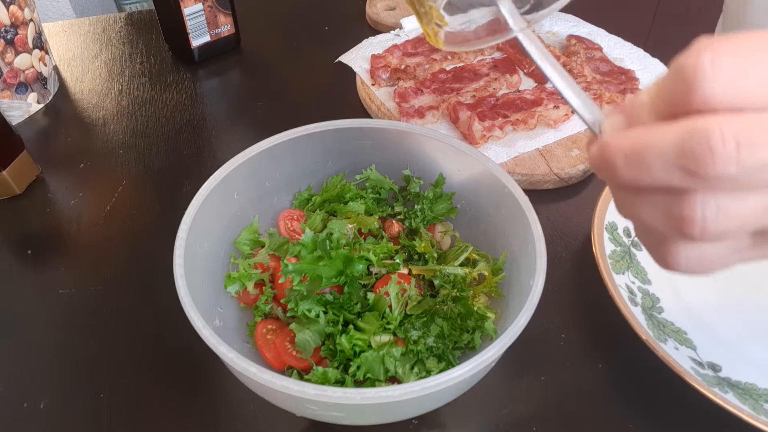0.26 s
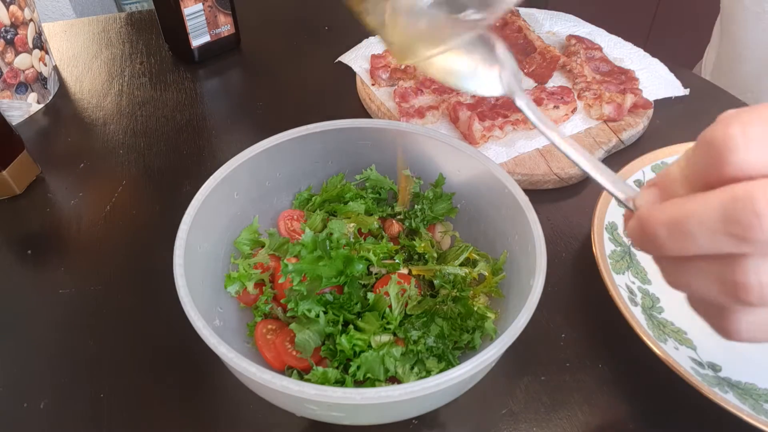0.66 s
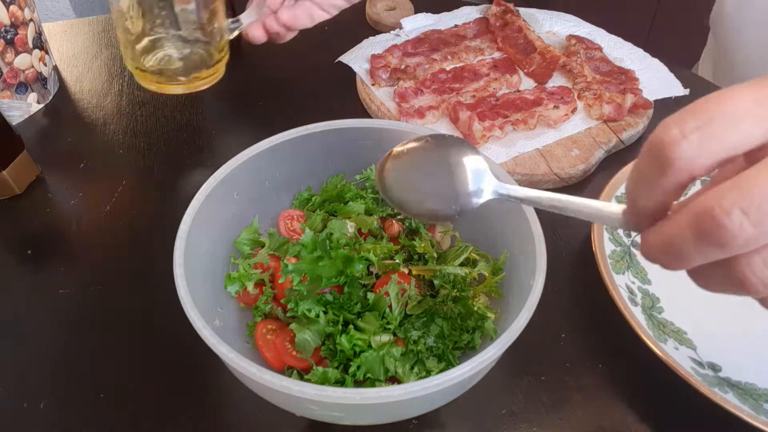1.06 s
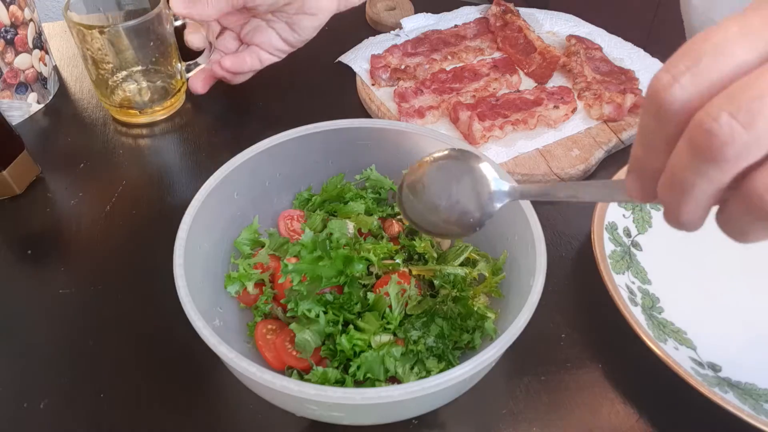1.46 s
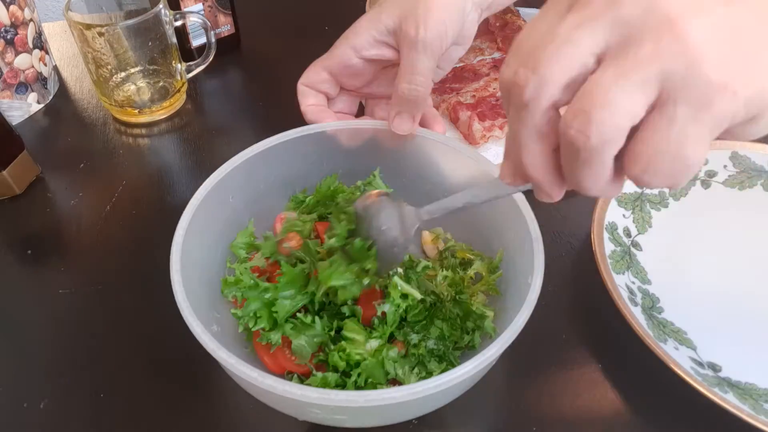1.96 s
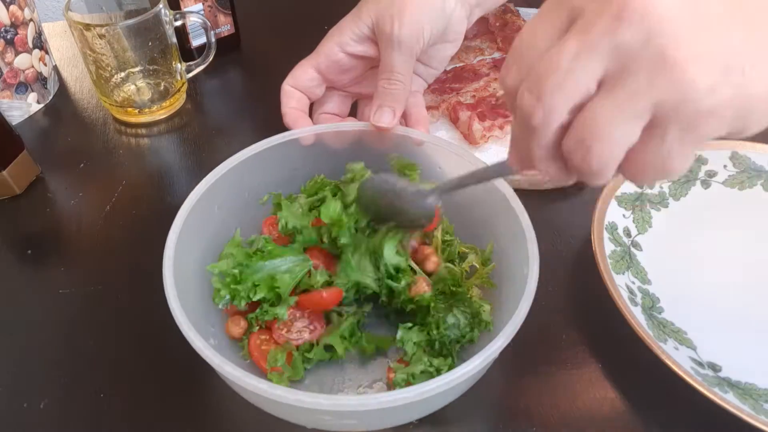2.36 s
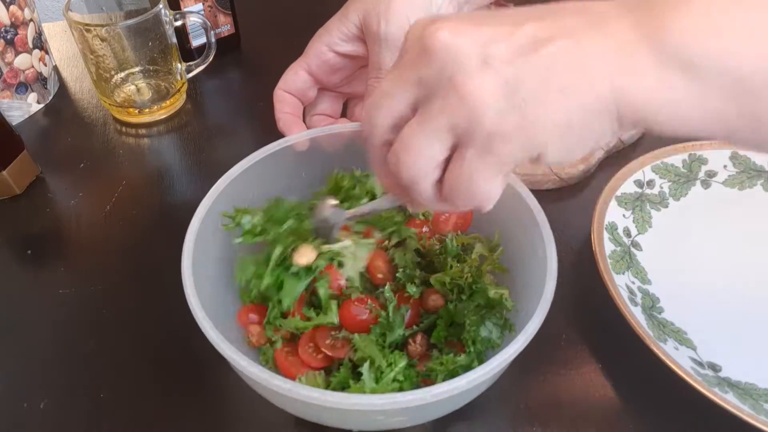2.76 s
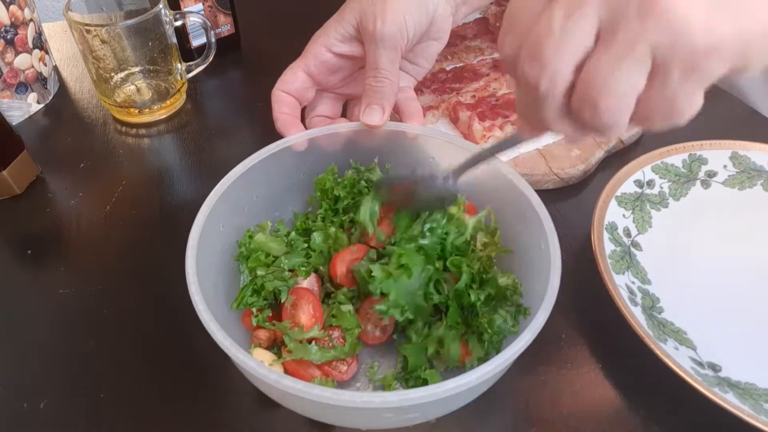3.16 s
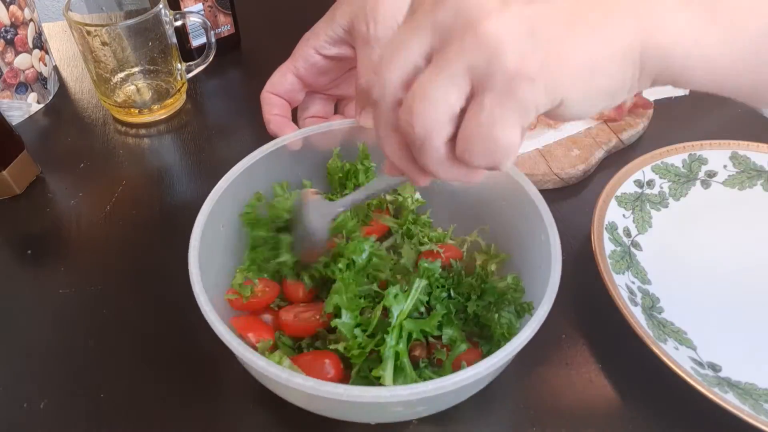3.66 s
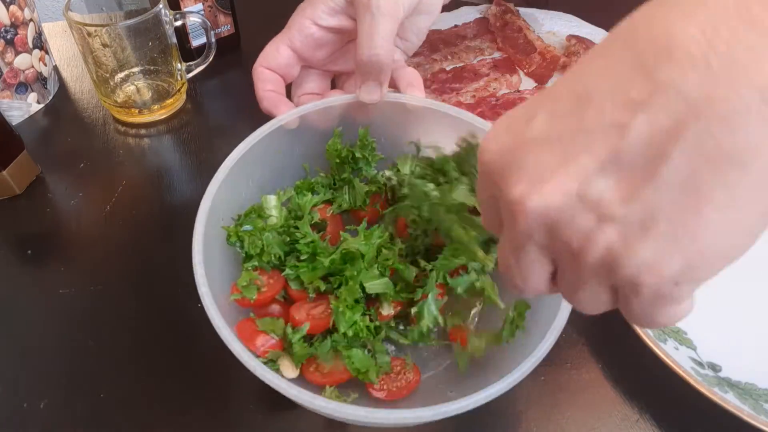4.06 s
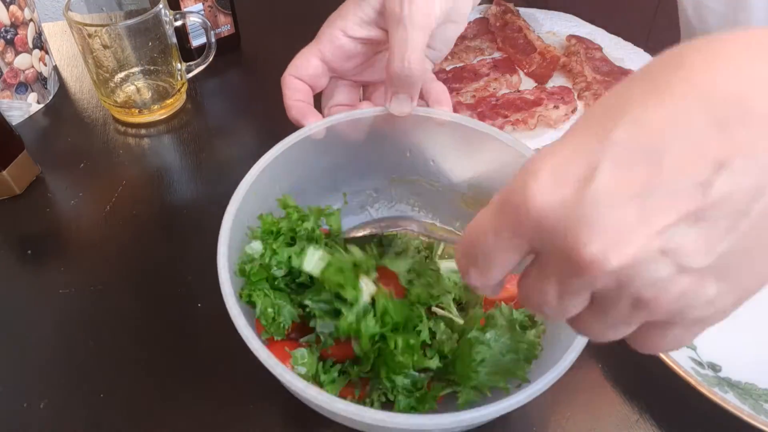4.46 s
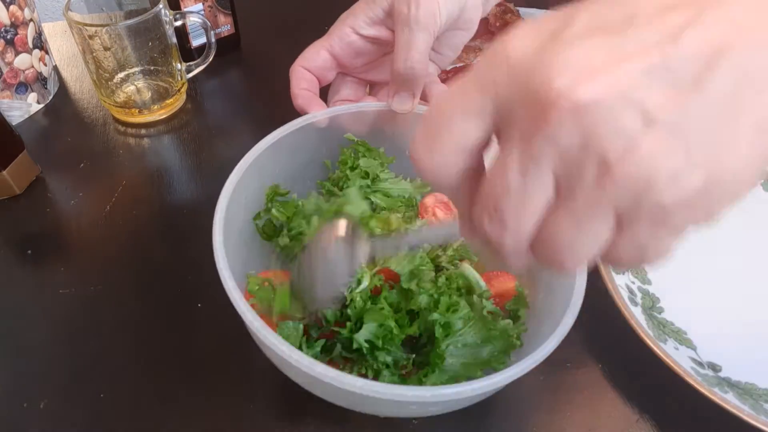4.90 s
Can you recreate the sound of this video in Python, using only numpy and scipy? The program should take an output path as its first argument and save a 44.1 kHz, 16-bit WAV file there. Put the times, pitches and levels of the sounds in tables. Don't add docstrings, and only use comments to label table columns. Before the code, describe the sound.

Close-up kitchen sound: hard, bright, damped glass clinks with a scratchy slide come first, thinning out within a second. After a brief lull, a heavy mug rocks onto a wooden table top. Salad mixing follows, each sweep a swish of leaves with spoon taps on dull plastic, bowl bumps on the table, and tiny stem snaps. Short room echo and a quiet steady fridge hum lie underneath.

```python
import sys
import numpy as np
from scipy import signal
from scipy.io import wavfile

SR = 44100
rng = np.random.default_rng(int(sys.argv[2]) if len(sys.argv) > 2 else 0)


def undo_db(level):
    steps = np.asarray(level, float) / 20
    return 10 ** steps


def generate_wav(sig):
    pcm = np.round(np.clip(np.atleast_2d(sig).T, -1, 1) * 32767).astype(np.int16)
    wavfile.write(sys.argv[1], SR, pcm)


N = 226365
SECONDS = np.arange(N) / SR
SIDES = np.array([[1], [-1]])


def at_hz(points, hz):
    table_hz, table_value = np.transpose(points)
    return np.interp(np.log(hz), np.log(table_hz), table_value)


def rms_one(x):
    return x / np.sqrt(np.mean(x ** 2) + 1e-20)


def band(x, low_hz, high_hz):
    edges_hz = [low_hz, min(high_hz, .45 * SR)]
    return signal.sosfilt(signal.butter(2, edges_hz, "band", fs=SR, output="sos"), x)


def drift(rate):
    r = np.exp(-80 * np.pi * rate / SR)
    noise = rng.standard_normal(N // 40 + 2002)
    slow = signal.lfilter([1], [1, -2 * r, r * r], noise)[2000:]
    return np.interp(np.arange(N) / 40, np.arange(len(slow)), rms_one(slow))


def ring(clicks, hz, t60_s):
    r, w = undo_db(-60 / (t60_s * SR)), 2 * np.pi * hz / SR
    return signal.lfilter([0, np.sin(w)], [1, -2 * r * np.cos(w), r * r], clicks + 1e-18)


def fade(clicks, t60_s):
    return signal.lfilter([1], [1, -undo_db(-60 / (t60_s * SR))], clicks + 1e-18)


def train(times_s, sizes):
    out = np.zeros((len(sizes), N))
    out[:, (np.asarray(times_s) * SR).astype(int)] = sizes
    return out


def coloured(white, spectrum, patchy_db, rate):
    total = 0
    for k, low_hz in enumerate(25 * 2 ** np.arange(0, 9.6, .5)):
        level = undo_db(at_hz(spectrum, low_hz * 1.214) + patchy_db * drift(rate))
        total = total + level * band(white[k % 2], low_hz, low_hz * np.sqrt(2))
    return rms_one(total)


def delayed(x, lag):
    n = np.arange(N)
    return np.array([x[0], np.interp(n - lag, n, x[1])])


def dip(x, hz, width_hz, db):
    return x - (1 - undo_db(db)) * signal.lfilter(*signal.iirpeak(hz, hz / width_hz, SR), x)


def voiced(x, rows):
    out, starts = x.copy(), sorted({row[0] for row in rows})
    ends = dict(zip(starts, starts[1:] + [N / SR]))
    for s, hz, width_hz, db in rows:
        now = slice(int(max(s - .001, 0) * SR), int((ends[s] - .001) * SR))
        out[:, now] = dip(out[:, now], hz, max(width_hz, 40), db)
    return out


def contact_levels(rows):
    start_s, force_db, hardness_db, focus_db = np.transpose(rows)[:4, :, None]
    place = np.arange(4) - 1.5
    return np.hstack([start_s, force_db + hardness_db * place - focus_db * place ** 2])


def struck(events, edges, modes, free_db, ring_db, crack_db, crack_t60, shift, soft_hz,
           lobe_db, pan_db, lag, apart=1.86, luck_db=4.0):
    rows = np.array(events)
    times = rows[:, 0] + 0.00083
    cracks, rings = np.zeros((2, N)), np.zeros((2, N + SR))
    luck = rng.standard_normal((60, 3, len(modes), 1))
    white = rng.standard_normal((4, 1, N)) + apart * rng.standard_normal((4, 2, N))
    for k, (low, high) in enumerate(zip(edges, edges[1:])):
        blows = train(times, [undo_db(rows[:, 1 + k] + crack_db[k])])
        click = band(blows, low, high) * 0.25 * SR / (high - low)
        rattle = 0.83 * fade(blows, crack_t60[k]) * rms_one(band(white[k], low, high))
        cracks += band(click + rattle, low / 1.34, high * 0.92)

    hz, db, t60 = np.transpose(modes)[:, :, None]
    k = np.clip(np.searchsorted(edges, hz) - 1, 0, 3)
    t = np.arange(int(min(t60.max(), 1) * SR)) / SR
    for row, s, free, (strength, beam, place) in zip(rows, times, free_db, luck):
        height = undo_db(row[1 + k] + free + np.array(ring_db)[k] + db + luck_db * strength)
        moved_hz = hz * (1 + shift * place)
        tones = height * undo_db(-60 * t / t60) * np.sin(2 * np.pi * moved_hz * t)
        lobes = undo_db(SIDES * lobe_db * beam.T)
        start = int(s * SR)
        rings[:, start:start + len(t)] += lobes @ tones

    soft = signal.butter(2, min(soft_hz, .45 * SR), fs=SR, output="sos")
    small = signal.butter(4, 1.0 * edges[0], "high", fs=SR, output="sos")
    out = signal.sosfilt(small, cracks + signal.sosfilt(soft, rings[:, :N]))
    return delayed(out * undo_db(SIDES * pan_db / 2), lag)


# start_s, force_db, hardness_db (per band), focus_db, spoon_ring_db
CLINKS = [(0.001, -25.5, 4, 1.5, -32), (0.018, -32.5, 1.3, 2.5, -38), (0.121, -21.5, 2, 0.8, -36.5),
          (0.214, -20.5, 4.5, 1.2, -34.5), (0.294, -42, 7, 3, -48.5), (0.312, -40.5, -5, -3.5, -53),
          (0.349, -47, 0.1, 4, -44.5), (0.366, -26, 2.5, 3.5, -18), (0.452, -28.5, 1, -0.5, -44),
          (0.477, -41.5, -2.5, 4, -37), (0.526, -23.5, -0.5, 0.5, -27), (0.535, -19, 2, -2, -27),
          (0.544, -27, 6.5, 5, -23), (0.649, -37, 1.5, 2, -40), (0.7, -47.5, 0.5, -0.7, -64),
          (0.757, -40, -0.3, -1.4, -67.5), (0.798, -48, 4, 0, -79)]
CHATTER = [(0.008, -31, 1.5, -0.5, -44.5), (0.013, -31.5, 1, 0.5, -45), (0.023, -36, 0, 1.5, -40.5),
           (0.056, -41, -2, 0.5, -40), (0.14, -37.5, 2, 2, -55), (0.158, -36.5, 0.5, -1, -50),
           (0.177, -38, -2, 3, -55), (0.236, -37.5, 1, 5, -55), (0.657, -43.5, 0, 2, -39),
           (0.791, -54, 4, 1, -80), (0.806, -53.5, 3, 3, -80), (0.196, -44.5, 2, 2, -55),
           (0.385, -42, 0.5, 1, -50)]
# pitch_hz, level_db, t60_s (time to fall 60 dB)
GLASS = [(867, -3, .07), (1020, -6, .04), (1300, -7, .03), (2012, -6, .06), (2335, -4, .06),
         (2600, -3, .05), (3000, -6, .03), (3828, -8, .04), (4985, -7, .06), (5134, -5, .065),
         (5735, -4, .05), (6325, -5, .05), (7000, -8, .03), (8480, -11, .03), (9964, -10, .04),
         (10440, -2, .06), (10530, -4, .06), (11650, -8, .035), (12600, -5, .045), (13060, -10, .03),
         (14250, -14, .025)]
# start_s, level_db
SCRAPE = [
    (0.0, -45),
    (0.166, -36),
    (0.28, -51),
    (0.446, -42),
    (0.638, -59),
    (0.684, -57.5),
    (0.792, -83),
    (0.86, -72),
]
# start_s, pitch_hz, width_hz, level_db
GLASS_GRIP = [(0, 2090, 250, 4.5), (0, 6450, 500, 2.5), (0, 3515, 250, 5), (0.12, 3900, 900, -9.5),
              (0.121, 892, 120, 8), (0.121, 1348, 400, -6.5), (0.121, 5170, 400, 5.5),
              (0.121, 2803, 600, 3), (0.214, 2455, 600, 5), (0.214, 1400, 600.4, -7.5),
              (0.214, 3900, 300, 6), (0.214, 4600, 400, -6), (0.214, 10180, 900, 2), (0.312, 883, 200, 3),
              (0.312, 1299, 400, -10.5), (0.312, 2500, 300, 6), (0.312, 5150, 250, 9),
              (0.367, 3605, 800, -7), (0.367, 6330, 250, 2), (0.366, 5140, 250, 4), (0.452, 2800, 600, 5.5),
              (0.452, 5120, 250, 9.5), (0.452, 3700, 500, -6), (0.526, 5150, 300, 7.5),
              (0.526, 900, 399, -7), (0.535, 4300, 500, -7), (0.535, 5740, 300, 6.5),
              (0.535, 8290, 2000, -4.5), (0.535, 1504, 599.3, 7), (0.535, 12600, 1500, 4.5),
              (0.535, 720, 300, -8.5), (0.649, 2300, 300, 7), (0.756, 2500, 300, 4),
              (0.757, 6400, 500, 5.5)]
# pitch_hz, width_hz, level_db
GLASS_VALLEYS = [(3464, 540, -5), (7820, 1000, -13.5), (10900, 730, -11), (9250, 310, -6.5),
                 (15730, 1600, -14)]


def spoon_on_glass():
    touches = CLINKS + CHATTER
    taps = struck(contact_levels(touches), [750, 1600, 3500, 8000, 14500], GLASS,
                  free_db=np.zeros(len(touches)), ring_db=[-13.5, -4.5, -7.5, -2.0],
                  crack_db=[-4.0, 6.5, 2.5, -1.5], crack_t60=[0.016, 0.028, 0.032, 0.071],
                  shift=0.0055, soft_hz=15900, lobe_db=3.0, pan_db=2.0, lag=1.2)
    rows = np.array(touches)
    spoon_clicks = train(rows[:, 0] + 0.00066, [undo_db(rows[:, 4] - 9.0)])
    spoon = ring(spoon_clicks, hz=2198, t60_s=0.18)
    grit = rng.standard_normal((2, N)) * undo_db(3.5 * drift(60))
    slide = sum(undo_db(db) * ring(grit, hz, t60) for hz, db, t60 in GLASS)
    slide = rms_one(slide) + 0.9 * rms_one(band(grit, 1500, 13500))
    slide_db = np.interp(SECONDS, *np.transpose(SCRAPE), right=-120)
    out = voiced(taps + undo_db(slide_db - 10) * slide, GLASS_GRIP) + spoon
    for valley in GLASS_VALLEYS:
        out = dip(out, *valley)
    return out


# pitch_hz, t60_s
KITCHEN = [(100, 0.44), (400, 0.32), (1500, 0.36), (5000, 0.34), (14000, 0.25)]


def kitchen(x):
    t = np.arange(int(.7 * SR)) / SR
    own, shared = rng.standard_normal((2, 2, len(t))), rng.standard_normal((2, 1, len(t)))
    tail = 0
    for hz in 60 * 2. ** np.arange(9):
        alike = 1 / (1 + (hz / 750) ** 2.3)
        white = np.sqrt(1 - alike) * own + np.sqrt(alike) * shared
        octave = band(white, hz / np.sqrt(2), hz * np.sqrt(2))
        tail = tail + octave * undo_db(-60 * t / at_hz(KITCHEN, hz))
    tail = tail * np.clip((t - .004) / 0.005, 0, 1)
    tail = tail / np.sqrt((tail ** 2).sum(2).mean())
    turn = 2 * np.pi * 1.7 * SECONDS
    sent = x.mean(0) * np.array([np.cos(turn), np.sin(turn)])[:, None]
    return signal.fftconvolve(sent, tail, axes=2)[..., :N].sum(0)


# start_s, level_db
HANDLING = [(0, -58.5), (.4, -63.5), (.75, -80), (.81, -62), (.95, -86), (1.1, -72), (1.3, -61),
            (1.75, -70), (2.1, -74.5), (2.3, -64), (2.65, -82), (2.95, -64.5), (3.4, -72), (3.7, -57),
            (4.25, -58.5), (4.6, -70), (4.95, -74), (5.13, -68)]


def thrum():
    level_db = np.interp(SECONDS, *np.transpose(HANDLING))
    lumpy = undo_db(5.0 * drift(9.0)) * rng.standard_normal(N)
    murmur = rms_one(band(ring(lumpy, 119, 0.069), 75, 270))
    return undo_db(level_db - 3.0) * murmur * undo_db(SIDES * 3.5)


# pitch_hz, level_db
MOTOR = [(96.9, -76), (123.8, -72), (193.8, -67.5), (247.6, -81), (274.5, -82), (839.8, -91.5),
         (2945, -65.5), (2993, -78.5), (3042, -77.5), (3090, -73.5), (3138, -79), (3235, -88.5)]
# pitch_hz, level_db
AIR = [(30, -30.5), (60, -19), (140, -1), (300, -12.5), (520, -23), (800, -14.5), (1100, -36), (2300, -25),
       (3050, -26), (3600, -37.5), (7000, -42.5), (14000, -44.5), (16500, -59)]


def fridge():
    level_db = .15 * (np.interp(SECONDS, *np.transpose(HANDLING)) + 68)
    hum = 0
    for (hz, db), phase in zip(MOTOR, rng.uniform(0, 2 * np.pi, len(MOTOR))):
        tone = np.sqrt(2) * np.sin(2 * np.pi * hz * SECONDS + phase + SIDES * 0.75)
        pan = undo_db(SIDES * (2.0 + 1.6 * (hz < 220)))
        hum = hum + undo_db(db + 1.1 * drift(2.8)) * tone * pan
    white = 1.2 * rng.standard_normal((2, 1, N)) + .3 * rng.standard_normal((2, 2, N))
    air = undo_db(-72.5) * coloured(white, AIR, patchy_db=3.5, rate=7.2) * undo_db(SIDES * 3.0)
    return undo_db(level_db) * (hum + air)


# start_s, force_db, hardness_db (per band), focus_db
SET_DOWN = [
    (0.797, -74, -19, 0),
    (1.326, -23, -6, 2),
    (1.345, -29, -7.5, 3.5),
    (1.374, -36, -7, 6.5),
    (1.399, -34, -8, 9),
    (1.551, -33.5, -11, 2),
    (1.591, -41, -4, 8.5),
    (1.599, -39.5, -8.5, 6),
]
# pitch_hz, level_db, t60_s
TABLE = [(120, 0.5, 0.14), (278, 0, 0.3), (366, -1.5, 0.39), (418, 4, 0.23), (459, 5, 0.23),
         (605, -8.5, 0.25), (654, -6, 0.2), (702, 6.5, 0.33), (776, -33.5, 0.17), (826, -5, 0.2),
         (869, 4.5, 0.3), (1030, -8.5, 0.13), (1200, -8, .13), (1378, -2.5, 0.13)]
# start_s, pitch_hz, width_hz, level_db
MUG_PLACE = [(1.326, 460, 60, 2), (1.326, 700, 60, 2.5), (1.326, 1210, 120, 3), (1.36, 429, 120, -4),
             (1.36, 700, 79.5, 5), (1.36, 1050, 100, 1.5), (1.551, 451, 80, 7), (1.551, 600, 60, 3.5),
             (1.551, 280, 60, -4), (1.551, 1030, 80, 3.5), (1.551, 690, 80, -4.5), (1.551, 125, 50, 4),
             (1.582, 120, 60, -7), (1.582, 379, 70.2, 5.5), (1.582, 860, 200, -5), (1.582, 700, 60, 2.5)]


def mug_on_table():
    thuds = struck(contact_levels(SET_DOWN), [70, 330, 1000, 2500, 12000], TABLE,
                   free_db=np.full(len(SET_DOWN), -3.0), ring_db=[-5.0, -8.0, -11.5, 0],
                   crack_db=[-13.5, -5.0, -7.0, -14.5], crack_t60=[0.18, 0.18, 0.094, 0.11],
                   shift=0.003, soft_hz=1825, lobe_db=-0.3, pan_db=2.5, lag=2.0, apart=0.6, luck_db=1.5)
    return voiced(thuds, MUG_PLACE)


# start_s, level_db
FINGERS = [
    (1.3, -99),
    (1.379, -71),
    (1.506, -84),
    (1.664, -76.5),
    (1.82, -84.5),
]


def fingers():
    level_db = np.interp(SECONDS, *np.transpose(FINGERS), left=-120, right=-120)
    return undo_db(level_db) * rms_one(band(rng.standard_normal((2, N)), 4200, 5000))


# start_s, force_db, hardness_db (per band), focus_db
KNOCKS = [(1.816, -36.5, -0.5, 4.5), (1.821, -28, -3, 3), (1.864, -35, -7, 3.5), (1.959, -46, -2, 1),
          (2.15, -40.5, 4.5, 5), (2.338, -46.5, -4.5, 4.5), (2.445, -44, -4.5, 1.5), (2.465, -28, -4, 3.5),
          (2.649, -49.5, -4.5, 4.5), (2.739, -62, 8, 0), (2.998, -24, 9.5, 11.5), (3.031, -35.5, 0.5, 3),
          (3.16, -49, -14.5, 20), (3.235, -38, -26.5, 13.5), (3.258, -46, -25, 13.5), (3.004, -29, 6, 9.5),
          (3.335, -32.5, -7.5, -0.5), (3.436, -47, -12, 5), (3.483, -43, -21, 9), (3.019, -34.5, 7, 11),
          (3.572, -41, -3, 0), (3.67, -47.5, -12, 5.5), (3.8385, -23, 1.1, 2.1), (3.885, -37, 0.5, 1.5),
          (4.087, -54, -8, 4), (4.34, -26.5, -5.5, 6.5), (4.37, -39, -5, 8), (5.008, -26, -1, 1.8),
          (5.061, -29, -3, 22), (5.073, -19.5, -1, 2.5)]
MORE_KNOCKS = [(2.432, -55, 3, 3), (2.4, -51, -6, 5.5), (2.3, -61, -5, 8), (3.3, -47, -2, 22),
               (4.048, -59, -9, 5), (4.104, -52.5, -7.5, 3), (4.745, -64, 12, 2), (4.999, -53, 1, 10.5),
               (2.716, -62, 8, 2.5), (3.01, -33.5, 5, 9), (4.388, -40, -7, 10), (4.356, -40.5, -6, 9),
               (3.28, -57, -20, 14), (3.176, -55, -16, 15), (4.766, -56, -11, 2), (4.8, -63, -11, 2)]
# pitch_hz, level_db, t60_s
BOWL = [(460, -3, .03), (700, -2, .025), (865, -2, .02), (1055, 0, .018), (1340, 0, .016), (1550, -2, .015),
        (2050, -2, .012), (2400, -1, .012), (2750, 0, .012), (3200, -1, .01), (3800, -2, .01),
        (4770, -4, .007), (6500, -6, .006), (9800, -6, .005)]
# start_s, pitch_hz, width_hz, level_db
BOWL_PLACE = [(1.816, 2900, 800, 4), (1.816, 1000, 300, 4), (1.863, 600, 300, 0), (2.15, 2710, 400, -0.5),
              (2.337, 2020, 250, 14), (2.432, 604, 300, 3), (2.465, 2360, 400, 6.5),
              (2.465, 1060, 300, 3.5), (2.639, 1530, 300, 3.5), (2.986, 1430, 300, 11),
              (2.998, 2730, 1000, 6.5), (2.998, 1430, 300, 4.5), (2.998, 4400, 500, 4.5),
              (3.16, 1210, 400, 5), (3.235, 1300, 500, 5.5), (3.235, 536, 300, -11), (3.334, 703, 200, 0.5),
              (3.336, 1160, 400, 2), (3.438, 2010, 400, 14.5), (3.483, 1020, 500, 7.5),
              (3.483, 480, 200, -5), (3.572, 650, 400, -3), (3.838, 1370, 250, 3.5), (3.838, 780, 250, 7),
              (3.838, 6200, 800, -4), (3.838, 4750, 400, 3.5), (3.838, 2500, 300, 2.5),
              (3.885, 1340, 250, 1), (3.886, 2600, 500, 5), (3.885, 4350, 600, -8),
              (4.048, 1197, 604, -0.5), (4.339, 1060, 250, 9.5), (4.339, 1900, 800, 7),
              (4.339, 647, 300, -6), (4.339, 2800, 400, 3.5), (4.339, 4440, 500, 4.5),
              (4.744, 4260, 800, 2), (5.008, 1330, 300, 4), (5.059, 2160, 250, 12), (5.072, 990, 300, 4),
              (5.072, 2320, 400, 3.5), (5.072, 780, 250, -10), (5.072, 3500, 300, -3), (5.072, 480, 150, 3),
              (2.998, 900, 500, -5)]


def spoon_on_bowl():
    touches = KNOCKS + MORE_KNOCKS
    free_db = -0.55 * np.array(touches)[:, 3]
    knocks = struck(contact_levels(touches), [400, 880, 1900, 4100, 16000], BOWL,
                    free_db=free_db, ring_db=[-8.5, -20.5, -19.0, 5.5],
                    crack_db=[-1.45, -0.44, 0.87, 0.26], crack_t60=[0.019, 0.026, 0.041, 0.034],
                    shift=0.054, soft_hz=16800, lobe_db=6.0, pan_db=3.5, lag=7.42)
    return voiced(knocks, BOWL_PLACE)


# full_s, rise_s, rustle_db, settle_s (to lose 20 dB), drag_db
RUSTLE = [(1.828, 0.02, -49, 0.15, -36), (2.15, 0.021, -58, 0.35, -54), (2.472, 0.021, -52.5, 0.1347, -41),
          (2.773, 0.064, -54.5, 0.21, -86), (2.999, 0.024, -53, 0.23, -61), (3.338, 0.027, -52, 0.27, -49),
          (3.667, 0.09, -54.5, 0.08, -77), (3.842, 0.011, -59, 0.39, -42.5), (4.05, 0.26, -65.5, .5, -63),
          (4.345, 0.02, -63, 0.21, -41), (4.768, 0.081, -58, 0.18, -58.5), (5.009, 0.0059, -51, 1.5, -70),
          (5.08, 0.0066, -54.5, -11, -67)]


def sweeps():
    still_db, still_drag_db = -81.5, -89
    rustle, slow, drag = undo_db(still_db), undo_db(still_db), undo_db(still_drag_db)
    for s, rise, db, settle, drag_db in RUSTLE:
        loss_db = 20 * np.maximum(s - SECONDS, 0) / max(rise, .003)
        age = np.maximum(SECONDS - s, 0) / max(settle, .03)
        sweep = undo_db(db - loss_db - 20 * age ** 1.2)
        rustle = rustle + sweep
        slow = slow + sweep * min(rise / 0.039, 1.3)
        drag = drag + undo_db(drag_db - loss_db - 20 * age / 0.48)
    bright_db = -10 + 5 * slow / rustle
    return 20 * np.log10(rustle), bright_db, 20 * np.log10(drag)


# pitch_hz, level_db
LEAVES = [(250, -3.5), (450, -14), (900, -15.5), (1700, -8), (3000, -5.5), (6000, -7), (10500, -9),
          (14500, -7.5), (16500, -15.5)]


def leaves(rustle_db, bright_db):
    sizes = undo_db(5.5 * np.minimum(rng.exponential(1, (2, N)), 3.5))
    sizes = sizes * (rng.random((2, N)) < 2500 / SR)
    grains = rms_one(sizes * rng.choice([-1, 1], (2, N)))
    shared, own = rng.standard_normal((2, 1, N)), rng.standard_normal((2, 2, N))
    white = 0.44 * grains[:, None] + 1.35 * shared + 1.56 * own
    hiss = coloured(white, LEAVES, patchy_db=1.0, rate=16)
    low = signal.sosfilt(signal.butter(2, 2800, fs=SR, output="sos"), hiss)
    tinted = hiss - low + undo_db(-bright_db) * low
    return delayed(undo_db(np.minimum(rustle_db, -54) + 4.5) * tinted * undo_db(SIDES * 1.6), 8.23)


# start_s, peak_db, deepest_note_db
PUSHES = [(1.866, -28.5, -9), (2.188, -38, -1.5), (2.206, -40.5, -1.5), (2.443, -43, -12),
          (2.809, -60.5, 17), (3.033, -45.5, -3), (3.342, -35, -28), (3.618, -38.5, -16), (3.649, -47, 9),
          (3.841, -37, -1.5), (4.304, -49, -1), (4.766, -41, -22), (5.022, -43.5, -13), (5.082, -23, -26.5),
          (5.093, -35, -22), (5.074, -34, -22), (4.341, -39, -15)]
# pitch_hz, t60_s
TABLE_BOOM = [(119, 0.058), (212, 0.086), (277, 0.13), (366, 0.094)]


def bowl_on_table(drag_db):
    start_s, peak_db, deep_db = np.transpose(PUSHES)
    drag = 0.021 * undo_db(drag_db + 0.51 * drift(13.0)) * rng.standard_normal(N)
    out = 0
    for (hz, t60), level_db in zip(TABLE_BOOM, [deep_db, -9, -1.5, -13]):
        pushes = train(start_s, [undo_db(peak_db + level_db)])[0]
        out = out + ring(pushes + drag, hz, t60)
    return band(out, 95, 484) * undo_db(SIDES * 2.4)


# start_s, length_s, pitch_hz, level_db
RUBS = [
    (4.73, 0.03, 2570, -66),
    (4.735, 0.03, 4100, -68),
    (2.75, 0.03, 2500, -74),
]


def rubs():
    grit = rng.standard_normal((2, N))
    out = 0
    for s, length, hz, db in RUBS:
        swell = np.exp(-((SECONDS - s) / length) ** 2)
        out = out + undo_db(db) * swell * rms_one(band(grit, hz / 1.06, hz * 1.15))
    return out


# start_s, level_db
SNAPS = [(4.0494, -51), (4.2193, -43.5), (4.4694, -57), (4.5495, -66.5), (4.5685, -54), (4.6154, -58.5),
         (4.6344, -56), (4.6794, -60), (4.7194, -49), (4.8694, -61), (4.8994, -59.5)]


def snaps():
    start_s, level_db = np.transpose(SNAPS)
    burst = fade(train(start_s, [undo_db(level_db - 0.5)]), 0.018) * rng.standard_normal((2, N))
    return band(burst, 7800, 14500)


def scene():
    glass, mug, bowl = spoon_on_glass(), mug_on_table(), spoon_on_bowl()
    rustle_db, bright_db, drag_db = sweeps()
    begun = np.clip((SECONDS - 1.81) / 0.0046, 0, 1)
    salad = begun * (leaves(rustle_db, bright_db) + bowl_on_table(drag_db))
    glass_sent = dip(dip(glass, 10500, 300, -6.0), 15800, 2500, -15.0)
    sent = undo_db(-5.0) * glass_sent + undo_db(-5.5) * mug + undo_db(-3.0) * bowl + undo_db(-5.5) * salad
    echo = dip(kitchen(sent), 1210, 220, -6.0)
    return glass + mug + bowl + salad + echo + fridge() + thrum() + fingers() + snaps() + rubs()


def band_limit(x):
    return signal.sosfilt(signal.butter(12, 16860, fs=SR, output="sos"), x)


# pitch_hz, bass_boost_db
LEFT_BASS = (140, 5.2)
# pitch_hz, width_hz, level_db
LEFT_DIP = (330, 200, -6)
# pitch_hz, width_hz, level_db
MIC_DIP = (1765, 430, -8)


def record(dry):
    x = signal.sosfilt(signal.butter(4, 55, "high", fs=SR, output="sos"), dry)
    bass_hz, bass_db = LEFT_BASS
    bass = signal.sosfilt(signal.butter(1, bass_hz, fs=SR, output="sos"), x)
    x = x + (undo_db(SIDES * bass_db / 2) - 1) * bass
    x = x + undo_db(-82) * band(rng.standard_normal((2, N)), 3500, 16000)
    x = dip(np.array([dip(x[0], *LEFT_DIP), x[1]]), *MIC_DIP)
    rounded = 1.06 * np.tanh(x / 0.87)
    mix = signal.sosfilt(signal.cheby2(24, 60, 16000, fs=SR, output="sos"), rounded)
    return band_limit(mix)


dry = scene()
out = record(dry)
generate_wav(out)
```